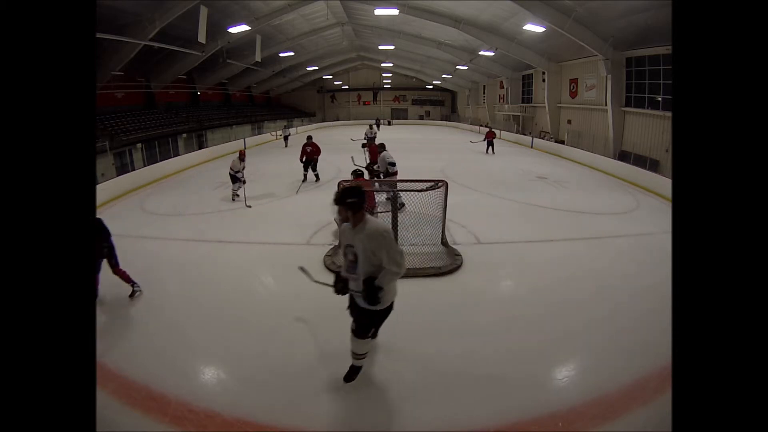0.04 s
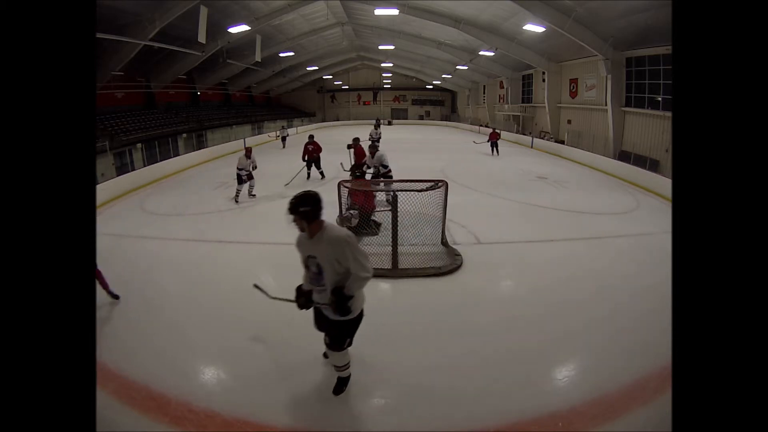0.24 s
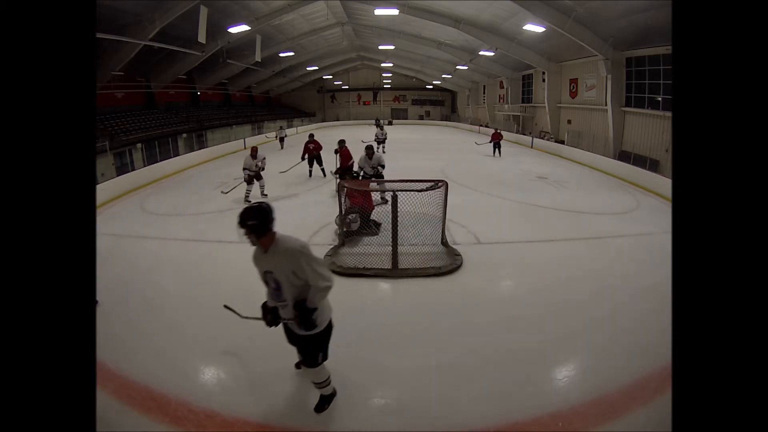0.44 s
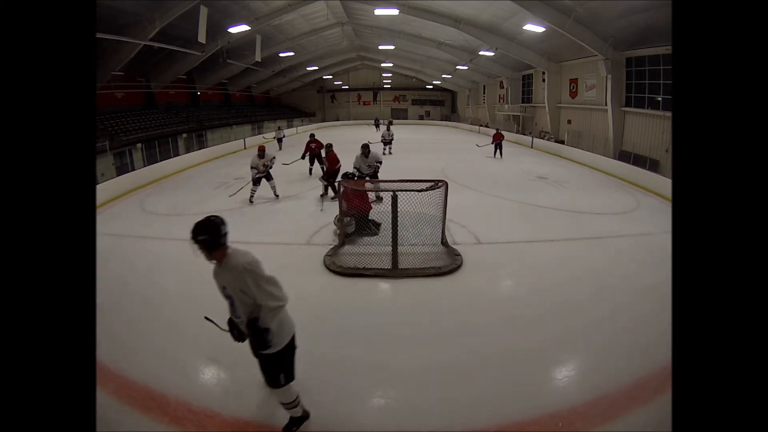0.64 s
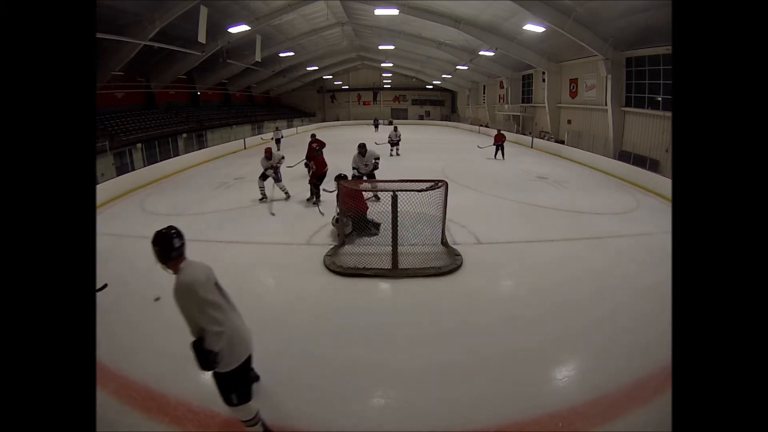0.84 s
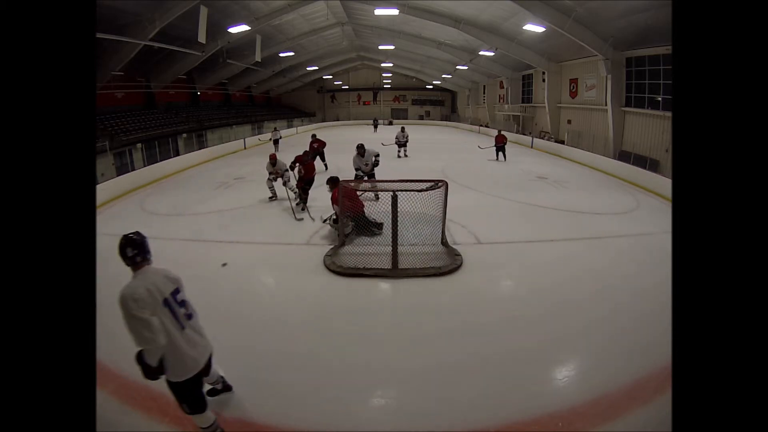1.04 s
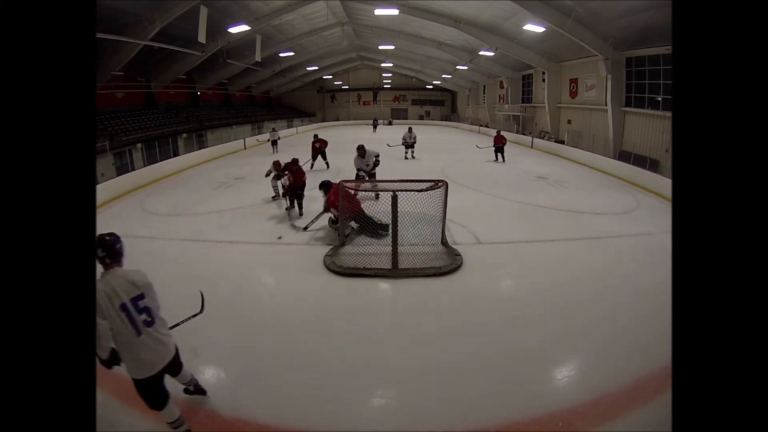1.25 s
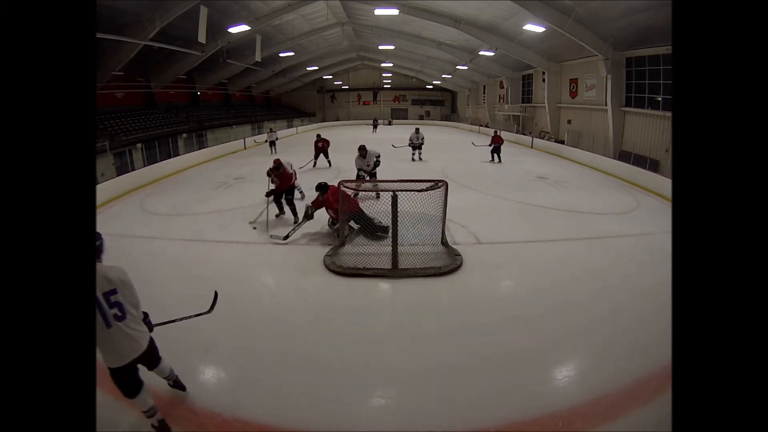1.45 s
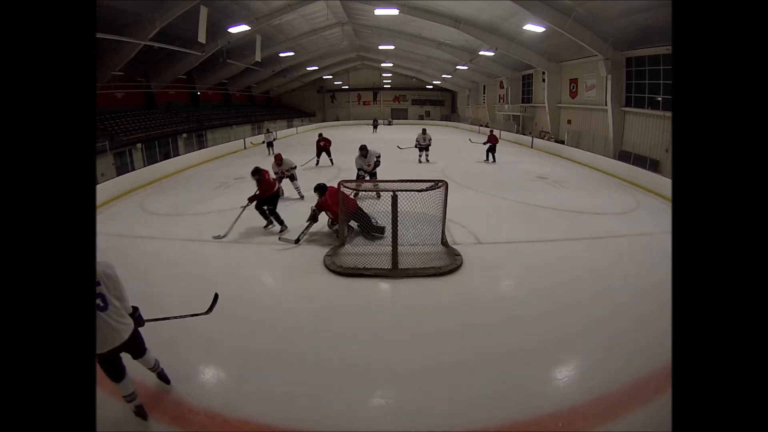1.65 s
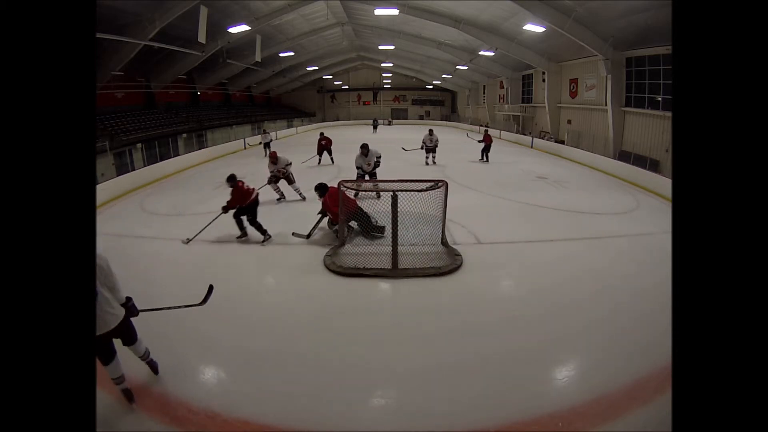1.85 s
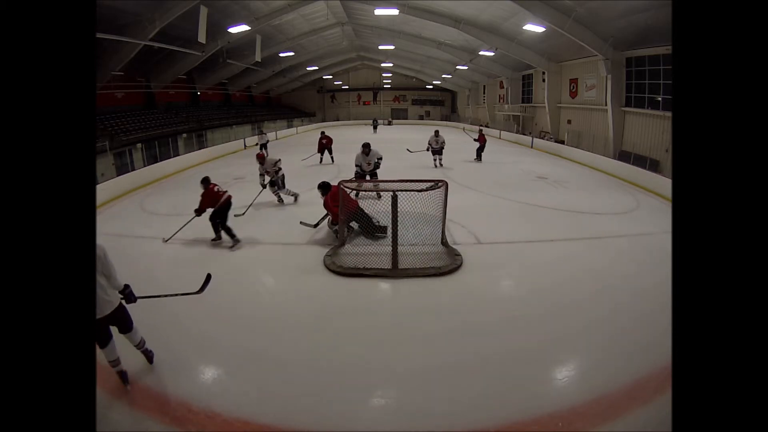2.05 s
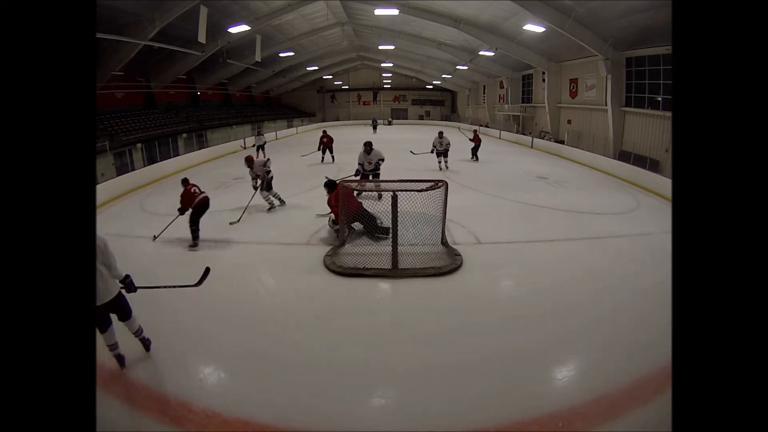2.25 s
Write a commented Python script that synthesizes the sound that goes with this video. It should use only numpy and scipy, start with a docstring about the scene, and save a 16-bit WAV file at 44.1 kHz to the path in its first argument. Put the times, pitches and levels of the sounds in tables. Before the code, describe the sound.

A hard knock booms on hockey rink boards, amid clacking sticks and scraping skates.

```python
"""Ice hockey behind the goal

A hard knock close by makes the boards, the wall around the rink, crack and boom.
Out on the ice, sticks and puck clack while skate blades scrape and hiss.
The large indoor hall rings on after the hits, over dull thuds and a low hum."""
import sys
import numpy as np
from scipy import signal
from scipy.fft import rfft, irfft, next_fast_len
from scipy.io import wavfile
from scipy.ndimage import uniform_filter1d

SR = 44100
rng = np.random.default_rng(int(sys.argv[2]) if len(sys.argv) > 2 else 0)


def inscribe(sig):
    """Save sig as 16-bit PCM at rate SR to the path in sys.argv[1].

    A 1-D sig is mono; a 2-D sig holds one channel per row.
    Samples are clipped to [-1, 1] before scaling.
    """
    pcm = np.round(np.clip(np.atleast_2d(sig).T, -1, 1) * 32767)
    wavfile.write(sys.argv[1], SR, pcm.astype(np.int16))


N = 99225
T = np.arange(N) / SR

# A colour says which pitches are strong in a sound. Each row: pitch in Hz, relative level in dB.
RUMBLE_COLOUR = [(20, -10), (42, -16), (66, -17), (92, 0), (130, -4.5), (200, 2.5), (255, -1.5),
                 (310, -12.5), (480, -20.5), (900, -31.5), (2000, -41)]
FAR_PLAY_COLOUR = [(150, -10), (350, -0.5), (520, -6), (900, 0), (1300, -1.5)]
THUD_COLOUR = [(30, -27.5), (70, -12.5), (92, -23), (120, -6), (165, -8), (205, -11.5), (250, -1.5),
               (285, -13.5), (350, -25), (460, -28.5), (900, -59)]
SKATING_COLOUR = [(300, -67), (550, -13.5), (900, -20), (1220, -7), (1480, 4), (1900, 3), (2350, 2),
                  (2750, -5), (3400, -25), (4200, -18.5), (5700, -34), (7400, -30.5), (8300, -30.5),
                  (11500, -37), (15000, -32)]
SCRAPING_COLOUR = [(400, -43), (1200, -4), (2600, 2.5), (3400, 10.5), (4200, 1), (5500, 3.5), (6600, -2.5),
                   (7500, -7.5), (8400, -15.5), (11000, -18), (15000, -37.5)]
ECHO_COLOUR = [(200, 1), (450, -41), (1000, -7.5), (1600, -9), (2700, -1), (4000, -2.5), (8000, -18)]
CLASH_COLOUR = [(350, -45), (800, -11.5), (1300, -11.5), (1900, -2), (2250, 4), (2450, -5.5), (2750, -10),
                (4000, -35), (8000, -50)]
CLACK_COLOUR = [(150, -30), (450, -7.5), (900, -5), (1450, 4), (2200, 1), (2900, 0.5), (4000, -3.5),
                (5300, 0.5), (6600, -9.5), (7600, -10.5), (8600, -28), (10200, -19), (15000, -25)]
HOLLOW_COLOUR = [(100, -19.5), (160, 4), (320, -0.5), (520, -7.5), (1000, -4.5), (1400, -8.5), (2500, -32)]
KNOCK_COLOUR = [(120, -13.5), (310, 2), (520, -25.5), (1080, -8.5), (1300, -8.5), (1580, 2.5), (2050, -6),
                (2480, 1.5), (2850, -9), (3300, -17.5), (4600, -24.5), (6500, -44), (9000, -49),
                (15000, -78)]

# How the lasting sounds grow louder and softer. Each row: time in seconds, level in dB.
DRONE_LEVELS = [(0, -71), (.5, -53), (.8, -59.5), (1.13, -52), (1.35, -65), (1.58, -62.5), (1.7, -56.5),
                (2.02, -51.5), (2.15, -63)]
FAR_PLAY_LEVELS = [(0, -60), (.3, -60.5), (.8, -61.5), (1.35, -63), (1.8, -58.5), (2.25, -58)]
SKATING_LEVELS = [(0, -48), (.19, -48), (.33, -44), (.5, -47.5), (.78, -44.5), (.88, -48.5), (1.15, -46.5),
                  (1.36, -48.5), (1.52, -47.5), (1.76, -48.5), (1.98, -46.5), (2.25, -46.5)]
SCRAPING_LEVELS = [(0, -57), (.3, -54.5), (.7, -52.5), (.92, -52.5), (1.06, -46.5), (1.18, -48),
                   (1.32, -51), (1.44, -47), (1.56, -50), (1.7, -56.5), (1.88, -55.5), (2.0, -53),
                   (2.25, -54)]

# The notes the hall hums. Each row: pitch in Hz, width in Hz, level in dB.
HUM_NOTES = [(216.1, 9.1, -62.5), (229.8, 5.8, -56)]
# Thuds that travel through the boards. Each row: peak time in seconds, level in dB, panel pitch in Hz.
THUDS = [(0.03, -44.5, 245.3), (0.087, -42, 211.4), (.372, -40, 239), (.482, -43, 217),
         (0.616, -40.5, 220.5), (0.668, -42, 233), (.71, -49, 223.5), (.801, -51, 243),
         (0.939, -49.5, 221.4), (1.01, -45, 228.3), (1.09, -40, 209.7), (1.136, -40.5, 214.7),
         (1.236, -53, 221.6), (1.41, -41.5, 224.6), (1.829, -46.5, 209.4), (1.905, -46.5, 224.4),
         (1.987, -45.5, 206.7), (2.176, -47.5, 220.5), (2.239, -46.5, 218)]
# Single hissing skate strokes. Each row: middle and half length in seconds, pitch and width in Hz,
# level in dB.
SKATE_STROKES = [(0.22, 0.34, 6700, 1300, -64), (0.24, 0.29, 11000, 4000, -72.5),
                 (0.42, 0.05, 4000, 1800, -57.5), (0.49, 0.12, 10050, 1900, -62),
                 (0.63, 0.27, 3700, 786, -55.5), (1.425, 0.033, 7100, 890, -57.5),
                 (1.998, 0.034, 5630, 690, -50), (2.001, 0.047, 9800, 2800, -68),
                 (2.195, 0.047, 6800, 630, -58), (2.18, 0.07, 10600, 2940, -69.5)]
# Stick and puck hits. Each row: start in seconds, level in dB, low edge, high edge and blade pitch in Hz,
# ring and chatter in dB next to the click, fade time in seconds. A fade time is the time to fall 60 dB.
CLACKS = [(0.2774, -36, 900, 2270, 1990, -8, -14, .05), (0.2874, -33.5, 1210, 2450, 2140, -7, -7, 0.074),
          (0.6489, -29.5, 248, 2560, 2070, -31, -21.5, 0.019),
          (0.8047, -45.5, 3500, 9000, 5170, -35, -3, 0.043), (0.9358, -45, 990, 3000, 1690, -16, 1, .04),
          (0.9917, -34, 1480, 5700, 3110, -14, 3, 0.059), (1.051, -40, 2020, 5000, 3430, -19, -8, 0.036),
          (1.0899, -39, 1200, 2800, 2280, -20, -10, 0.035),
          (1.0954, -33.5, 1230, 3070, 2040, -20, -12, 0.046),
          (1.1012, -26, 945, 11900, 1890, -24, -18, 0.02),
          (1.159, -38.5, 1480, 6000, 2370, -33, -19, 0.024),
          (1.3005, -43, 2500, 13100, 4360, -26, -8, .022),
          (1.4271, -28, 480, 5730, 1950, -29.5, -23.5, 0.028),
          (1.432, -31, 900, 2800, 2384, -4, -18, 0.062), (1.4375, -31, 990, 2660, 1700, -36, -18, 0.04),
          (1.4423, -33, 1080, 10000, 2310, -27, -27.5, 0.026),
          (1.4743, -35, 1020, 2400, 2230, -18, -19, 0.026),
          (1.4772, -35.5, 1210, 2620, 2140, -13, -31, 0.036), (1.57, -37, 1180, 2542, 2284, -1, -1, 0.048),
          (1.628, -38.5, 1220, 2340, 2045, -2, -5, .06), (1.703, -38, 1210, 2350, 2210, -8, -15, 0.074),
          (1.821, -40.5, 1390, 2420, 2320, -16, -7, 0.04), (1.8285, -37.5, 990, 2600, 2125, -8, -5, 0.045),
          (1.836, -37.5, 890, 2980, 1640, -23, -14, 0.027), (1.89, -49.5, 1660, 9050, 5850, -24, -17, .015),
          (1.9902, -33, 940, 4000, 1490, -10, -10.5, 0.021),
          (2.121, -48, 3540, 11000, 5950, -33, -12, 0.014), (2.137, -46.5, 2500, 5000, 3800, -19, -9, .03),
          (2.169, -49, 3000, 8000, 5560, -31, -12, 0.013),
          (2.1962, -36.5, 1280, 2620, 1870, -27, -14.5, 0.028)]
# Waves that bend the boards at the knock. Each row: start in seconds, strength in dB,
# travel time at 1000 Hz in seconds.
BENDING_WAVES = [(0.2076, -34.5, 0.008), (0.2147, -27, 0.0055), (0.222, -23.5, 0.00019),
                 (0.2255, -29, 0.00037)]
# The notes the boards ring at. Each row: pitch in Hz, level in dB, then fade time, delay and
# rise time in seconds.
BOARD_NOTES = [(62.7, -38, 0.57, 0.0205, 0.033), (189, -29.5, 0.2, 0.057, 0.015),
               (219.7, -20, 0.29, 0.01, 0.023), (303, -20, 0.11, 0.007, 0.016),
               (352.3, -38, 0.34, 0.012, 0.013), (428, -38.5, 0.31, 0.0037, 0.0032),
               (1100, -32.5, 0.13, 0, 0.0022), (1454, -28, 0.19, 0.0017, 0.0017),
               (1584, -30, 0.21, 0, 0.0018), (1870, -35, 0.28, 0.005, 0.0014),
               (2390, -29, 0.088, 0.0063, .002), (2765, -38, 0.18, 0.00039, 0.0018)]

KNOCK_S = .2215   # when the boards are hit


def from_db(db):
    """Turn decibels into a number to multiply by."""
    return 10 ** (np.asarray(db) / 20)


def rms_one(x):
    """Scale a sound so that its average strength (rms) is 1."""
    return x / np.sqrt(np.mean(x ** 2) + 1e-20)


def steady(x):
    """Even out the slow swings of a noise, at strength 1."""
    local_power = uniform_filter1d(np.abs(signal.hilbert(x)) ** 2, size=2000)
    return rms_one(x / np.sqrt(local_power))


def level(rows):
    """Join rows of seconds and dB into a volume curve."""
    return from_db(np.interp(T, *np.transpose(rows)))


def dying(t, fade_s):
    """Start at t = 0 and fall 60 dB every fade_s seconds."""
    return (t >= 0) * np.exp(-np.log(1000) * np.maximum(t, 0) / fade_s)


def swell(at, rise_s, fade_s):
    """Grow to a peak at the given time, then die away."""
    return np.exp(np.minimum(T - at, 0) / rise_s) * dying(np.maximum(T - at, 0), fade_s)


def coloured(x, colour):
    """Filter a sound to follow a colour table, falling 18 dB an octave above its last row."""
    size = 2 * next_fast_len(len(x))
    hz, db = np.transpose(colour)
    grid = np.maximum(np.arange(size // 2 + 1) * SR / size, 1)
    curve_db = np.interp(np.log(grid), np.log(hz), db) - 18 * np.maximum(np.log2(grid / hz[-1]), 0)
    # fold the filter so that it never rings before the sound arrives (minimum phase)
    cepstrum = irfft(np.log(from_db(curve_db)))
    cepstrum[1:size // 2] *= 2
    cepstrum[size // 2 + 1:] = 0
    return irfft(rfft(x, size) * np.exp(rfft(cepstrum)))[:len(x)]


def coloured_noise(colour):
    """Noise of the given colour, at strength 1."""
    return rms_one(coloured(rng.standard_normal(N), colour))


def narrow_noise(hz, width_hz):
    """Noise gathered around one pitch, at strength 1."""
    grid = np.arange(N // 2 + 1) * SR / N
    peak = 1 / (1 + 2 * ((grid - hz) / width_hz) ** 2)
    return rms_one(irfft(rfft(rng.standard_normal(N)) * peak, N))


def hum():
    """The hall rumbles steadily, with two wavering notes and a deep drone that swells and sinks."""
    rumble = from_db(-53.5) * coloured_noise(RUMBLE_COLOUR)
    drone = level(DRONE_LEVELS) * steady(narrow_noise(hz=73.2, width_hz=7.9))
    notes = sum(from_db(db) * steady(narrow_noise(hz, width_hz)) for hz, width_hz, db in HUM_NOTES)
    return rumble + drone + notes


def far_play():
    """The game far down the rink blurs into a dull wash."""
    return level(FAR_PLAY_LEVELS) * coloured_noise(FAR_PLAY_COLOUR)


def thuds():
    """Each thud sets a panel of the boards ringing at its own pitch, over a dull rumble."""
    rumble = from_db(-5) * steady(coloured_noise(THUD_COLOUR))
    tones, power = 0, 0
    for at, db, hz in THUDS:
        shape = from_db(db) * swell(at, rise_s=.018, fade_s=.23)
        tones += shape * np.sqrt(2) * np.sin(2 * np.pi * hz * (T - at))
        power += shape ** 2
    return tones + rumble * np.sqrt(power)


def crunch(colour, grit, grains_per_s=1500, flutter_db=1.37, flutters_per_s=44.51):
    """Ice breaks under steel: tiny grains over a smooth hiss. More grit (0 to 1) means more grains."""
    sizes = from_db(-.5 * np.minimum(rng.exponential(1, N), 4))
    signs = rng.choice([-1, 1], N)
    grains = rms_one(sizes * signs * (rng.random(N) < grains_per_s / SR))
    hiss = np.sqrt(1 - grit ** 2) * rng.standard_normal(N)
    wander = rms_one(np.interp(T * flutters_per_s, np.arange(1000), rng.standard_normal(1000)))
    return rms_one(coloured((grit * grains + hiss) * from_db(flutter_db * wander), colour))


def skates():
    """Skates wash over the whole rink, nearer blades bite into the ice, and single strokes hiss."""
    out = level(SKATING_LEVELS) * crunch(SKATING_COLOUR, grit=.36)
    out += level(SCRAPING_LEVELS) * crunch(SCRAPING_COLOUR, grit=.88)
    for at, half_length, hz, width_hz, db in SKATE_STROKES:
        shape = np.exp(-((T - at) / half_length) ** 2)
        out += from_db(db) * shape * narrow_noise(hz, width_hz)
    return out


def hall_echo(x, rise_s=.014):
    """The hall's many echoes blend into one long tail."""
    tail = rng.standard_normal(N) * dying(T, fade_s=4) * (1 - np.exp(-T / rise_s))
    tail = coloured(tail / np.linalg.norm(tail), ECHO_COLOUR)
    return from_db(-6.5) * signal.fftconvolve(x, tail)[:N]


def clash_ring(start_s=1.428, rise_s=.0047):
    """The hall holds the pitch of one clash of sticks, made here as fading noise."""
    t = np.maximum(T - start_s, 0)
    shape = (1 - np.exp(-t / rise_s)) * dying(t, fade_s=1.35)
    return from_db(-38) * shape * coloured_noise(CLASH_COLOUR)


def clacks(snap_db=-14.5):
    """Each hit of stick or puck is a click, a brief ring of the stick's blade and a noisy chatter."""
    out, t = np.zeros(N + SR), T[:SR // 10]
    for at, db, low_hz, high_hz, blade_hz, ring_db, chatter_db, fade_s in CLACKS:
        chatter = from_db(chatter_db) * rng.standard_normal(len(t))
        ring = from_db(ring_db) * np.cos(2 * np.pi * blade_hz * t)
        hit = (chatter + ring) * dying(t, fade_s)
        hit[0] += 1   # the click
        hit = coloured(hit, CLACK_COLOUR)
        dulled = signal.sosfilt(signal.butter(3, high_hz, fs=SR, output="sos"), hit)
        hit = dulled + from_db(snap_db) * hit   # a little reaches the ear undulled
        hit = signal.sosfilt(signal.butter(2, low_hz, "high", fs=SR, output="sos"), hit)
        hit /= np.sqrt(np.sum(hit ** 2) / (.005 * SR))   # as much energy as 5 ms at strength 1
        start = int(at * SR)
        out[start:start + len(t)] += from_db(db) * hit
    return out[:N]


def hollow(delay_s=.024):
    """The space behind the boards answers the knock with a dull boom."""
    shape = swell(KNOCK_S + delay_s, rise_s=.018, fade_s=.27) * (T > KNOCK_S)
    return from_db(-36.5) * shape * coloured_noise(HOLLOW_COLOUR)


def knock():
    """Bending waves crack and rattle through the boards, then the panels' own notes swell and fade."""
    crack = swell(KNOCK_S, rise_s=.0038, fade_s=.028)
    rattle = from_db(-5) * dying(T - KNOCK_S, fade_s=.14)
    force = from_db(-22.5) * (crack + rattle) * rng.standard_normal(N)
    grid = np.arange(N // 2 + 1) * SR / N
    for at, db, travel_s in BENDING_WAVES:
        cycles = grid * at + 2 * travel_s * np.sqrt(1000 * grid)   # high pitches arrive first
        force += from_db(db) * np.sqrt(.005 * SR) * irfft(np.exp(-2j * np.pi * cycles), N)
    filter_gain = np.linalg.norm(coloured(signal.unit_impulse(N), KNOCK_COLOUR))
    out = coloured(force, KNOCK_COLOUR) / filter_gain
    for hz, db, fade_s, delay_s, rise_s in BOARD_NOTES:
        t = np.maximum(T - KNOCK_S - delay_s, 0)
        shape = (1 - np.exp(-t / rise_s)) * dying(t, fade_s)
        out += from_db(db) * shape * np.sin(2 * np.pi * hz * t)
    return out


def scene():
    """The knock and the clacks echo in the hall, over skates, far play, thuds and hum."""
    hits = knock() + hollow() + clacks()
    return (hits + hall_echo(hits) + clash_ring() + skates() + far_play() + thuds() + hum())[None]


def record(dry, cutoff_hz=15000):
    """Cut the very highest pitches away steeply."""
    return signal.sosfilt(signal.ellip(10, .2, 80, cutoff_hz, fs=SR, output="sos"), dry)


dry = scene()
out = record(dry)
inscribe(out)
```